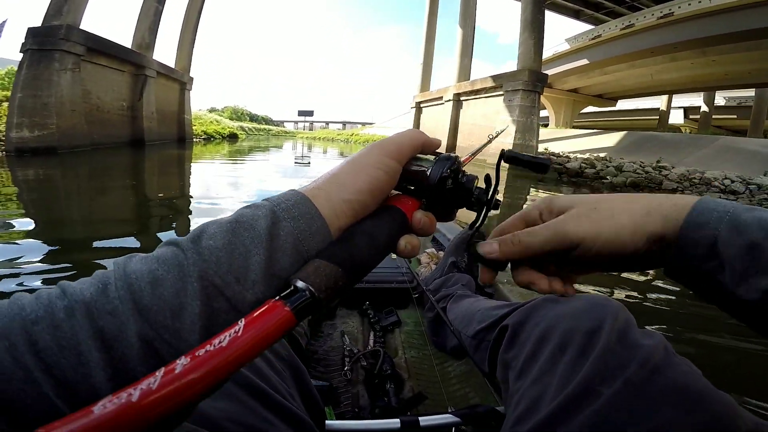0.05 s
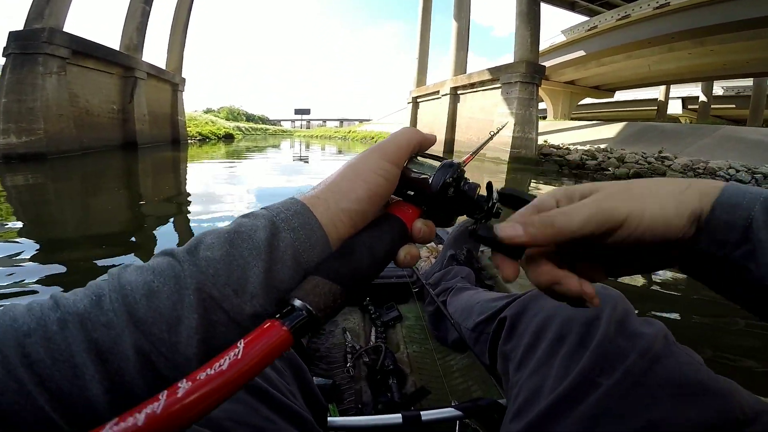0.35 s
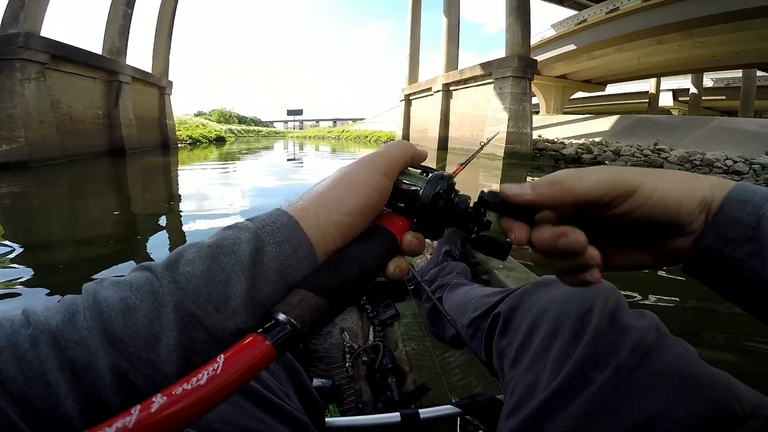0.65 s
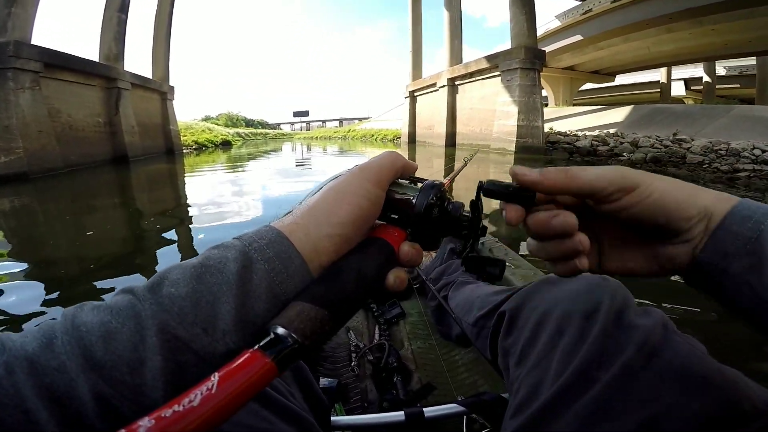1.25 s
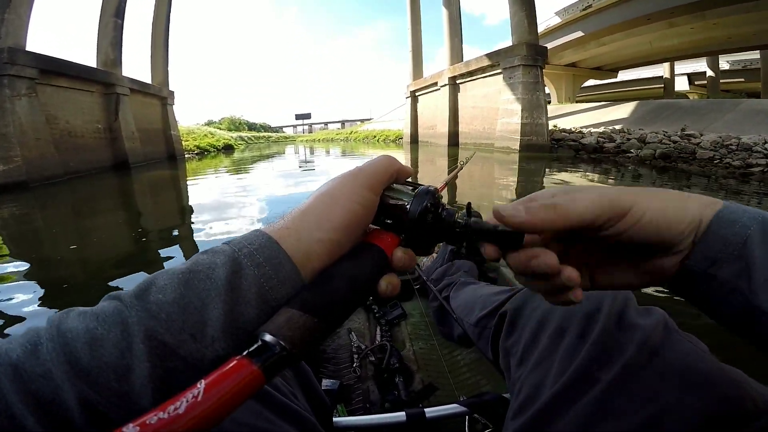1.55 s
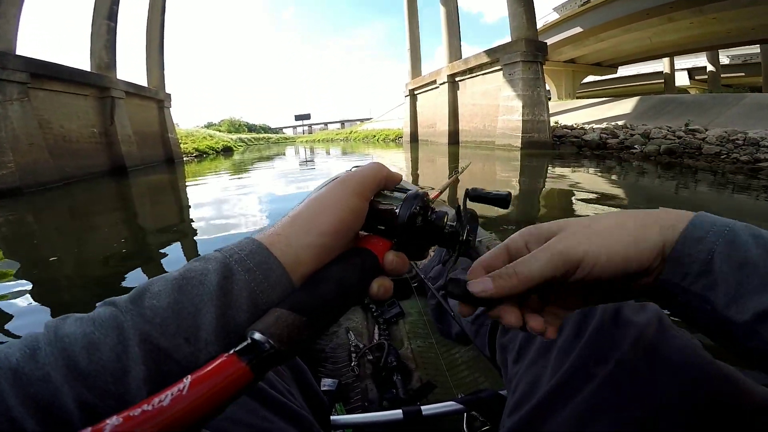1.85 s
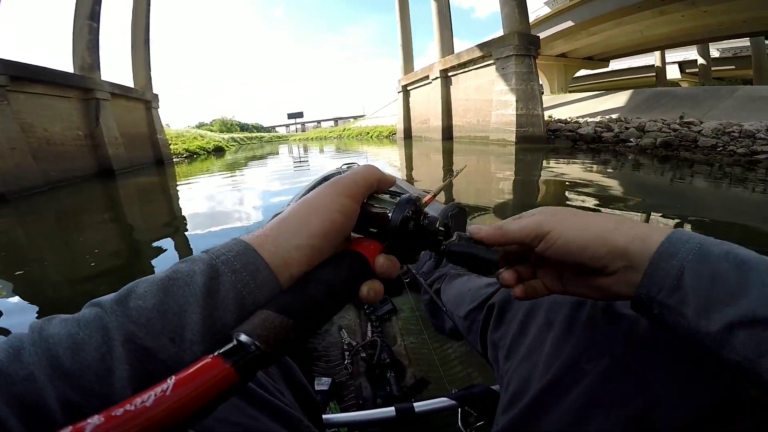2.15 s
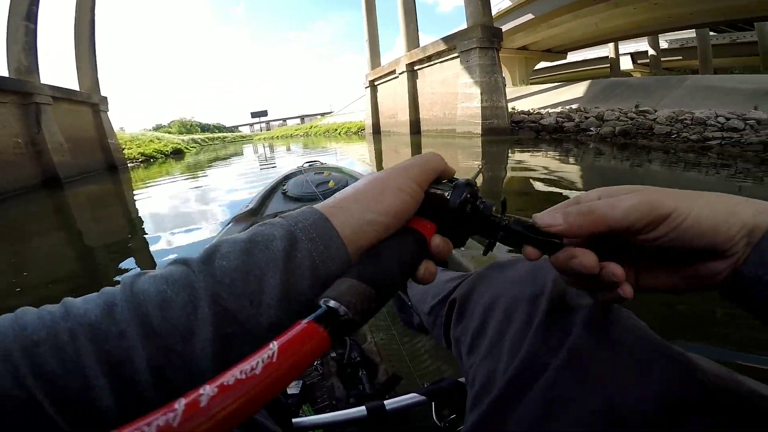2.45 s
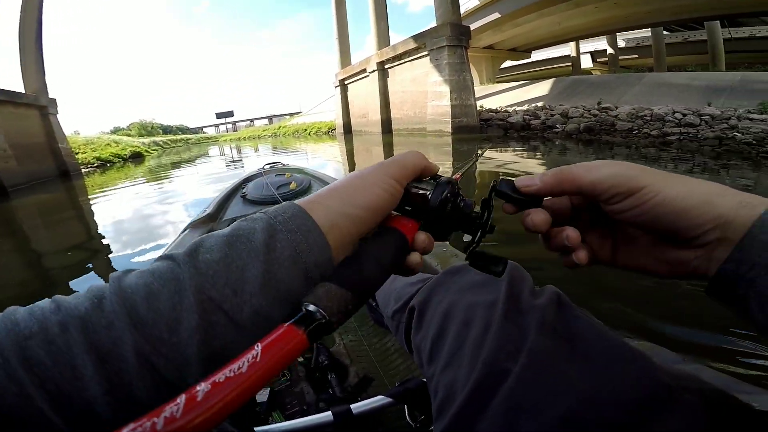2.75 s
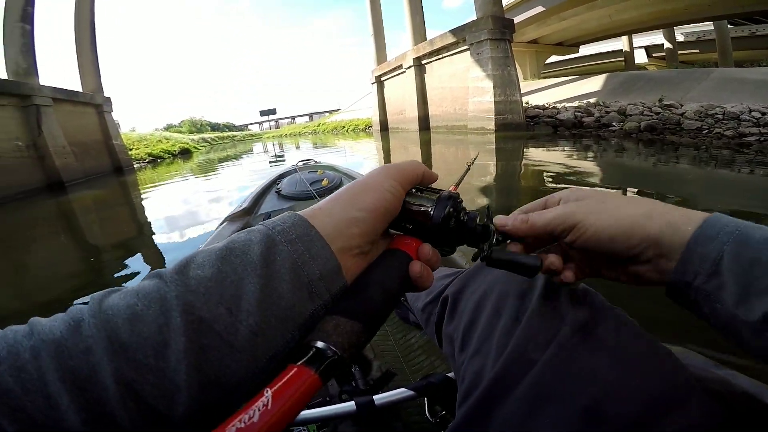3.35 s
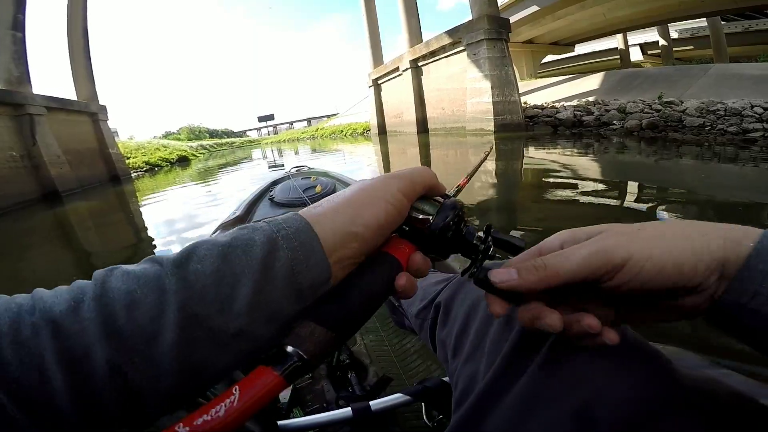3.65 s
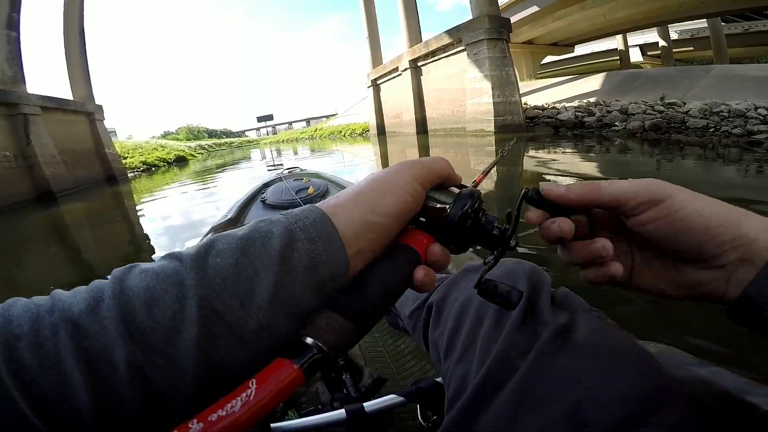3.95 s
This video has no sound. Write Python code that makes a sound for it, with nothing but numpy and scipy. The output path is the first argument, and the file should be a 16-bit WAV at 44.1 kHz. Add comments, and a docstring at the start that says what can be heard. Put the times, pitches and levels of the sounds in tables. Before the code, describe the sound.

Traffic roars and rumbles overhead throughout, heard from under a bridge. Wheels thud deeply over joints around 0.4, 0.8, 1.6, 2.4 and 3.6 seconds. A tyre whine falls in pitch near 2.6 seconds, and a lower howl swells from 3.3. Close by, a fishing reel ticks faintly, mostly in the first half second. A small bird chirps with slight echo at 2.6, 3.1 and 4 seconds.

```python
"""Traffic roars and rumbles overhead, heard from a kayak under a road bridge. Tyre treads sing: one tone
falls as its vehicle passes (Doppler shift), and a lower howl swells over an engine's drone.
Close by a fishing reel ticks with tiny impacts, while wheels thud over joints and set the deck swinging.
Line and sleeve rustle by friction, and a small bird chirps three times, echoing off the concrete."""
import sys
import numpy as np
from scipy import signal
from scipy.io import wavfile

SR = 44100
rng = np.random.default_rng(int(sys.argv[2]) if len(sys.argv) > 2 else 0)


def to_wav(sig):
    """Store sig (one row per channel, or 1-D mono) as 16-bit WAV at the path in sys.argv[1].

    Samples outside -1..1 are clipped; the rate is SR.
    """
    pcm = np.clip(np.atleast_2d(sig), -1, 1) * 32767
    pcm = np.round(pcm).astype(np.int16)
    wavfile.write(sys.argv[1], SR, pcm.T)  # frames by channels


N = 176400
T = np.arange(N) / SR


def from_db(db):
    """Decibels to amplitude ratio."""
    return 10 ** (np.asarray(db) / 20)


def unit_rms(x):
    """Normalisation to an rms of 1."""
    return x / np.sqrt(np.mean(x ** 2) + 1e-20)


def in_time(rows):
    """Linear interpolation of each column after the time column, at every sample."""
    times, *columns = np.transpose(rows)
    return [np.interp(T, times, column) for column in columns]


def add(out, start_s, x):
    """Superposition of a sound from a given time."""
    i = int(np.clip(start_s * SR, 0, N - 1))
    out[i:i + len(x)] += x[:N - i]


def drift(rate_hz):
    """Random modulation: low-passed noise with an rms of about 1."""
    step, settle = 40, 2000
    lowpass = signal.butter(2, rate_hz, fs=SR / step, output="sos")
    slow = signal.sosfilt(lowpass, rng.standard_normal(N // step + settle + 2))[settle:]
    return np.interp(np.arange(N) / step, np.arange(len(slow)), unit_rms(slow))


def banded_noise(spectrum, flicker_db):
    """Noise in third-octave bands, each with its own amplitude modulation; rms 1."""
    hz, db = np.transpose(spectrum)
    edges = 14 * 2 ** (np.arange(32) / 3)
    white, out = rng.standard_normal((2, N + SR // 2)), 0
    for k, (low, high) in enumerate(zip(edges, edges[1:])):
        band_db = np.interp(np.log(low * high) / 2, np.log(hz), db, left=-np.inf, right=-np.inf)
        flicker = drift(18)
        if np.isfinite(band_db):
            bandpass = signal.butter(3, [low, high], "band", fs=SR, output="sos")
            band = signal.sosfilt(bandpass, white[k % 2])[-N:]
            out = out + band * from_db(band_db + flicker_db * flicker)
    return unit_rms(out)


def blurred_tone(hz, width_hz):
    """Multipath fading: many reflections make a tone's amplitude and phase wander; rms 1."""
    phase = 2 * np.pi * np.cumsum(hz * np.ones(N)) / SR
    fading = drift(width_hz / 2) + 1j * drift(width_hz / 2)
    fading = fading / (np.abs(fading) + .5) ** .35  # partly evens out the level
    return unit_rms(np.real(fading * np.exp(1j * phase)))


def resonate(x, hz, q):
    """A second-order resonance of bandwidth hz / q."""
    return signal.lfilter(*signal.iirpeak(hz, q, fs=SR), x)


# Spectrum of the road's roar: frequency_hz, relative_density_db
ROAR_SPECTRUM = [(150, -12.5), (260, 2.5), (400, 2), (570, 0.5), (800, 1.5), (1050, 5.5), (1250, 1),
                 (1500, -4), (2000, -8), (2800, -18), (4000, -22), (5200, -29.5), (6500, -37),
                 (8000, -42.5), (11000, -47), (18000, -55)]
# Loudness of the traffic: time_s, level_db
ROAR_LEVEL = [(0, -31.5), (.3, -31), (.8, -31.5), (1.3, -30.5), (1.6, -31.5), (2.1, -31), (2.6, -27.5),
              (3.1, -30.5), (3.4, -30), (3.8, -31), (4, -30)]


def road_roar():
    """Rolling noise: many tyres sum to a broadband roar that follows how busy the road is."""
    return from_db(in_time(ROAR_LEVEL)[0]) * banded_noise(ROAR_SPECTRUM, flicker_db=1.07)


# Spectrum of the deck's vibration: frequency_hz, relative_density_db
DECK_SPECTRUM = [(12, -10), (27, 3), (40, 1.5), (62, 2), (88, -7.5), (130, -6.5), (190, -14.5), (270, -30),
                 (500, -44)]
# Strength of that vibration: time_s, level_db
DECK_LEVEL = [(0, -21.5), (.5, -24), (.77, -17.5), (1, -25), (1.6, -22.5), (2.1, -26.5), (2.4, -23),
              (2.8, -23.5), (3.3, -25), (4, -24)]


def deck_rumble():
    """Structure-borne sound: the deck, shaken by traffic, radiates low noise."""
    return from_db(in_time(DECK_LEVEL)[0]) * banded_noise(DECK_SPECTRUM, flicker_db=2.83)


# Loudness of the engine: time_s, level_db
ENGINE_LEVEL = [(0, -37), (1, -34), (1.7, -31), (2.6, -33.5), (3.3, -29), (4, -33)]


def engine_drone(pitch_hz=108, wander_hz=1.56, flutter_db=4.6):
    """Frequency and amplitude modulation: an engine's one low tone wavers at random."""
    phase = 2 * np.pi * np.cumsum(pitch_hz + wander_hz * drift(6.1)) / SR
    level_db = in_time(ENGINE_LEVEL)[0] + flutter_db * drift(4.7)
    return from_db(level_db) * unit_rms(np.sin(phase))


# Tread tone of the passing vehicle: time_s, pitch_hz, level_db
PASSING_TONE = [(0, 1353, -66), (1.0, 1351, -48), (1.8, 1330, -37.5), (2.3, 1316, -38.5),
                (2.6, 1265, -31.5), (2.85, 1226, -36), (3.2, 1167, -36.5), (3.5, 1172, -40.5),
                (4, 1158, -35.5)]


def tyre_song():
    """Doppler shift: one tread tone falls as its vehicle passes, while a distant one holds its pitch."""
    pitch_hz, level_db = in_time(PASSING_TONE)
    passing = from_db(level_db) * blurred_tone(pitch_hz, width_hz=47.6)
    distant = from_db(-41.5) * blurred_tone(1162, width_hz=88)
    return passing + distant


# Tread tones of the approaching tyres: pitch_hz, width_hz, relative_level_db
HOWL_CLUSTER = [(439.7, 16, -0.5), (474.7, 22.8, 0.5), (511, 22, -15)]
# Spectrum of the rush around them: frequency_hz, relative_density_db
RUSH_SPECTRUM = [(150, -3), (260, -3), (350, 0.5), (580, 0.5), (850, 0.5), (1300, -19), (3000, -28.5),
                 (8000, -46), (18000, -66)]
# Swell of the howl: time_s, level_db
HOWL_LEVEL = [(0, -45.5), (.95, -43), (1.35, -35.5), (1.8, -41.5), (2.3, -36), (2.8, -35), (3.3, -32.5),
              (3.48, -27.5), (3.68, -26), (3.9, -25), (4, -22)]


def tyre_howl(rush_db=-6):
    """Beating: closely spaced tread tones interfere, swelling with a rush of noise as they draw near."""
    tones = sum(from_db(db) * blurred_tone(hz, width_hz) for hz, width_hz, db in HOWL_CLUSTER)
    rush = from_db(rush_db) * banded_noise(RUSH_SPECTRUM, flicker_db=1)
    return from_db(in_time(HOWL_LEVEL)[0]) * (unit_rms(tones) + rush)


# Contacts of handle and spool: start_s, peak_db, centre_hz
REEL_TICKS = [(0.052, -33, 7400), (0.057, -41, 11000), (.109, -32, 3800), (0.113, -30, 3000),
              (.131, -37, 4470), (.311, -37, 10500), (.363, -37.5, 4960), (.401, -26.5, 4400),
              (0.401, -39, 10000), (.456, -40, 9000), (.497, -47, 7000), (.533, -46, 5500),
              (.879, -51, 11000), (1.176, -49, 9500), (1.261, -41, 11500), (1.305, -50, 11500),
              (1.335, -50, 11500), (1.441, -50, 11500), (1.682, -50, 13000), (1.834, -37, 5000),
              (1.904, -47, 8000), (2.453, -48, 10000), (2.959, -45, 6500), (3.177, -42, 9500),
              (3.247, -49, 13000), (3.355, -49, 12000), (3.456, -51, 13500), (3.631, -39, 11000),
              (3.669, -39.5, 10000), (3.894, -41, 10600), (3.958, -39, 12000)]


def fishing_reel(decay_s=.0015, gear_ticks_per_s=24, gear_db=-60.5):
    """Impact excitation: brief contacts drive broad resonances, over a sparse patter of gear teeth."""
    out, t = np.zeros(N), T[:SR // 40]
    for start_s, peak_db, centre_hz in REEL_TICKS:
        contact = rng.standard_normal(len(t)) * np.exp(-t / decay_s)
        tick = resonate(resonate(contact, centre_hz, q=1.9), centre_hz, q=1)
        add(out, start_s, from_db(peak_db) * tick / np.abs(tick).max())
    teeth = (rng.random(N) < gear_ticks_per_s / SR) * from_db(rng.normal(0, 2.4, N))
    decays = signal.lfilter([1], [1, -np.exp(-1 / (decay_s * SR))], teeth + 1e-18)
    patter = decays * rng.standard_normal(N)
    return out + from_db(gear_db) * resonate(patter, hz=11500, q=2.5)


# Wheels striking the deck joints: start_s, swing_peak_db
JOINT_STRIKES = [(0.299, -11), (0.349, -3), (0.37, -2), (.393, -12), (.736, -20), (.759, -7), (0.883, -4),
                 (1.317, -11.5), (1.605, -6), (2.333, -15.5), (2.453, -5), (3.54, -12), (3.648, -4),
                 (3.676, -9.5)]


def wheel_thuds(deck_hz=76.3, t60_s=.03, shudder_db=-17.5, shudder_decay_s=.041):
    """Damped oscillation: each wheel gives the deck one quickly dying swing and a short low shudder."""
    out, t = np.zeros(N), T[:SR // 3]
    lowpass = signal.butter(2, 165, fs=SR, output="sos")
    swing = -np.sin(2 * np.pi * deck_hz * t) * from_db(-60 * t / t60_s)
    swing = signal.sosfilt(lowpass, swing)
    swing /= np.abs(swing).max()
    for start_s, peak_db in JOINT_STRIKES:
        low_noise = unit_rms(signal.sosfilt(lowpass, rng.standard_normal(len(t))))
        shudder = from_db(shudder_db) * low_noise * np.exp(-t / shudder_decay_s)
        add(out, start_s, from_db(peak_db) * (swing + shudder))
    return out


# Rubs of line and sleeve: middle_s, half_length_s, level_db, centre_hz
RUBS = [(1.25, .13, -74, 11500), (2.698, .08, -70, 12500), (2.878, 0.049, -69, 9000),
        (3.21, 0.069, -66, 10300), (3.95, 0.047, -62, 10200)]


def rustles(grain_db=5.5):
    """Friction noise: line and sleeve rub in short grainy swells as the hand winds."""
    grain = rng.standard_normal(N) * from_db(grain_db * drift(120))
    out = np.zeros(N)
    for middle_s, half_length_s, level_db, centre_hz in RUBS:
        swell = np.exp(-((T - middle_s) / half_length_s) ** 2)
        out += from_db(level_db) * swell * unit_rms(resonate(grain, centre_hz, q=3.2))
    return out


def lead_note(length_s=.051, pitch_hz=6420, rise_hz=250, jitter=.019):
    """A linear frequency sweep: the thin rising note before each chirp."""
    progress = np.linspace(0, 1, int(length_s * SR))
    hz = (pitch_hz + rise_hz * progress) * (1 + jitter * drift(300)[:len(progress)])
    return np.sin(np.pi * progress) * np.sin(2 * np.pi * np.cumsum(hz) / SR)


# Overtones of the bird's whistle: pitch_ratio, relative_level_db
WHISTLE_OVERTONES = [(2, -22), (2.3, -32), (2.75, -30)]


def whistle(phase):
    """A sum of partials: a fundamental with a faint octave and inharmonic overtones."""
    return np.sin(phase) + sum(from_db(db) * np.sin(ratio * phase) for ratio, db in WHISTLE_OVERTONES)


# The bird's calls: start_s, level_db, length_s, fall_hz
BIRD_CALLS = [(2.632, -35, 0.045, 550), (3.146, -44, 0.067, 1120), (3.964, -38, 0.056, 654)]


def bird(pitch_hz=5510, scoop_hz=930, scoop_s=.00196, jitter=.019, ramp_s=.004, fade_db=7.5):
    """Frequency modulation: after a lead note, a two-voiced whistle scoops up and arches downwards."""
    out = np.zeros(N)
    for start_s, level_db, length_s, fall_hz in BIRD_CALLS:
        n = int(length_s * SR)
        t = T[:n]
        arch = (t / length_s) ** 2
        hz = pitch_hz - scoop_hz * np.exp(-t / scoop_s) - fall_hz * arch
        phase = 2 * np.pi * np.cumsum(hz * (1 + jitter * drift(400)[:n])) / SR
        voices = whistle(phase) + from_db(-10) * whistle(.94 * phase)
        rasp = 1 + .3 * drift(380)[:n]
        hiss = from_db(-32) * unit_rms(resonate(rng.standard_normal(N), hz=12000, q=1))[:n]
        ramps = np.clip(np.minimum(t, length_s - t) / ramp_s, 0, 1)
        envelope = ramps * from_db(level_db - fade_db * arch)
        add(out, start_s, envelope * (voices * rasp + hiss))
        add(out, start_s - .056, from_db(-54) * lead_note())
    return out


def bridge_echo(x, echo_db=-10.5, t60_s=.65, build_up_s=.06):
    """Reverberation: diffuse reflections from piers and deck build up, then decay exponentially."""
    t = T[:SR]
    tail = rng.standard_normal(SR) * from_db(-60 * t / t60_s) * np.minimum(t / build_up_s, 1)
    return x + from_db(echo_db) * signal.fftconvolve(x, tail / np.linalg.norm(tail))[:N]


def scene():
    """Superposition of all sources at the kayak, in one channel."""
    traffic = road_roar() + deck_rumble() + engine_drone() + tyre_song() + tyre_howl()
    return (traffic + fishing_reel() + wheel_thuds() + rustles() + bridge_echo(bird()))[None]


def record(dry):
    """Band limiting: a gentle roll-off below 12 Hz and a steep cut above 15.3 kHz."""
    highpass = signal.butter(1, 12, "high", fs=SR, output="sos")
    lowpass = signal.ellip(10, .1, 80, 15300, fs=SR, output="sos")
    return signal.sosfilt(lowpass, signal.sosfilt(highpass, dry))


dry = scene()
out = record(dry)
to_wav(out)
```